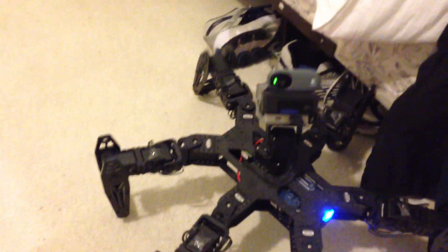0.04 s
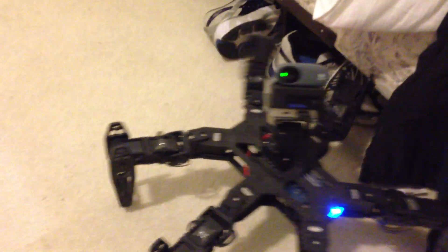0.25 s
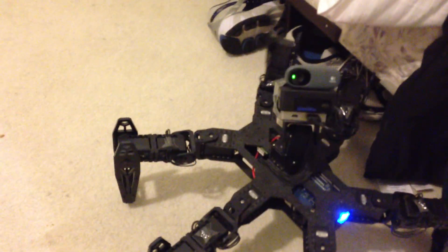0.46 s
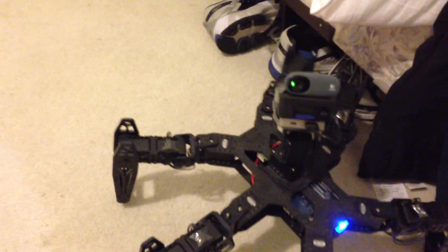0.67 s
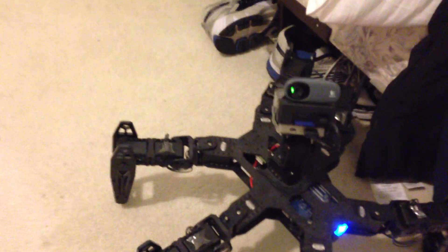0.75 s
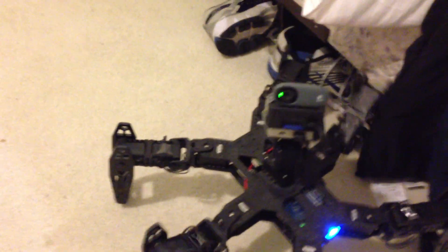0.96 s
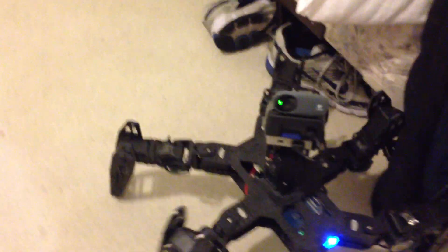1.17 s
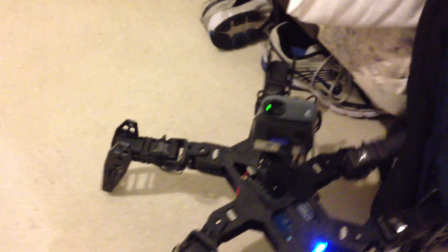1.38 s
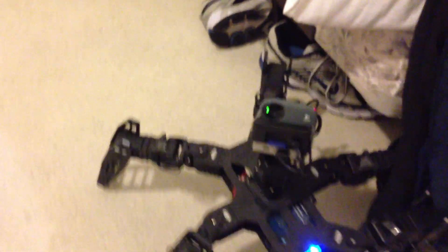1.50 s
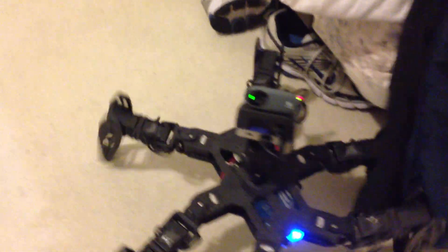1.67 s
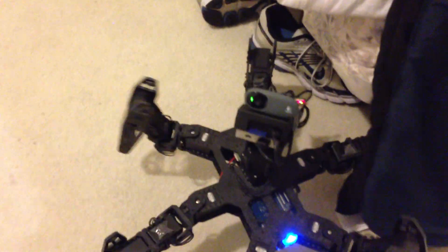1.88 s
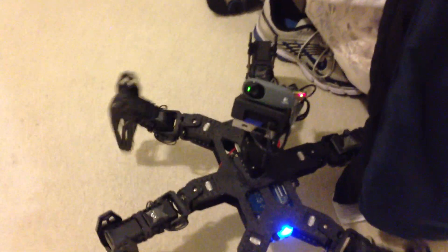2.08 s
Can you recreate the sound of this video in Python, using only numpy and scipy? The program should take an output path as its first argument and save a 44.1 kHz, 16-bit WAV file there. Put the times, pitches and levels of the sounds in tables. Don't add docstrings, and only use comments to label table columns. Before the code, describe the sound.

Close, thin phone-like pickup of a walking robot on carpet: raspy motor whines surge and drop in a steady stride rhythm, fluttering rapidly, with joint clicks and faint dull thumps over quiet room air.

```python
import sys
import numpy as np
from scipy import signal
from scipy.fft import rfft, irfft
from scipy.io import wavfile
from scipy.ndimage import uniform_filter1d

SR = 44100
rng = np.random.default_rng(int(sys.argv[2]) if len(sys.argv) > 2 else 0)


def inscribe(sig):
    pcm = np.round(np.clip(np.atleast_2d(sig).T, -1, 1) * 32767)
    wavfile.write(sys.argv[1], SR, pcm.astype(np.int16))


def field_ratio(decibels):
    return 10 ** (np.asarray(decibels, dtype=float) / 20)


N = 94506

# time in seconds, rattle level in dB.
EFFORT = [(0, -62), (.045, -79.5), (.16, -58), (.34, -57), (.46, -77.5), (.55, -60.5), (.72, -56),
          (.84, -78), (.98, -54), (1.15, -56.5), (1.24, -79), (1.31, -57), (1.52, -58), (1.6, -78),
          (1.75, -52.5), (1.92, -59.5), (2.01, -77), (2.14, -55.5)]
MULTIPLES_DB = [-7, 0, -3, -20, -20, -12]
# frequency in Hz, level in dB.
HOUSING = [(300, -30.5), (1110, -21.5), (2300, -13), (3200, -12), (4500, -6), (7000, -4.5), (9090, -16),
           (15400, -10)]
# frequency in Hz, width in Hz, boost in dB.
RINGS = [(2265, 190, 0.5), (5600, 1100, 2.5), (6700, 290, -4), (14800, 760, 3.5)]
# start in seconds, peak level in dB, pitch as a multiple of the usual one.
KNOCKS = [
    (.777, -36, 1.),
    (.984, -48, 1.1),
    (.998, -47, 1.2),
    (1.016, -45, 1.1),
    (1.203, -39, 1.6),
    (1.191, -49, 6.5),
    (1.972, -52, 10.),
]
# frequency in Hz, level in dB, time to fall by 60 dB in seconds.
KNOCK_MODES = [(890, -3, .014), (1250, -2, .009), (1770, 0, .011), (2200, -2, .008), (2900, -3, .007),
               (520, -13, .01)]
# centre in seconds, length in seconds, pitch in Hz, level in dB.
THUMPS = [
    (.56, 0.05, 208, -63),
    (0.733, 0.19, 241, -67),
    (1.1, 0.21, 223, -73.5),
    (1.369, 0.042, 228, -69),
    (1.79, 0.22, 323, -70.5),
]
# frequency in Hz, level in dB per Hz.
ROOM = [(25, -19), (64, -12.5), (110, -4.5), (209, 2), (1140, -8), (5400, -6.5), (13500, -17.5),
        (14500, -27)]
# time in seconds, tooth rate in Hz.
EARLY_SPEEDS = [
    [(.1, 1250), (.125, 1480), (.15, 1500), (.175, 1900), (.2, 2150), (.225, 2250), (.25, 2420), (.3, 1780),
     (.39, 1380)],
    [(.12, 1000), (.155, 1130), (.19, 1200), (.28, 2100), (.32, 2220), (.35, 1950), (.4, 1400), (.43, 1100)],
    [(.53, 1500), (.585, 2000), (.62, 2170), (.67, 2250), (.703, 2140), (.73, 1780), (.755, 1360),
     (.79, 1000)],
    [(.88, 1300), (.915, 1460), (.94, 1380), (.985, 2050), (1.01, 2460), (1.035, 2310), (1.06, 2460),
     (1.135, 1830), (1.19, 1200)],
]
# time in seconds, tooth rate in Hz.
LATE_SPEEDS = [
    [(1.27, 1500), (1.32, 2000), (1.34, 2240), (1.39, 2300), (1.44, 2410), (1.48, 1650), (1.515, 1400),
     (1.57, 1400)],
    [(1.36, 1600), (1.415, 1830), (1.46, 2060), (1.495, 2430), (1.52, 2330), (1.57, 1600)],
    [(1.65, 1700), (1.695, 2500), (1.72, 2510), (1.745, 2300), (1.77, 2400), (1.795, 2370), (1.82, 2170),
     (1.845, 1970), (1.95, 1200)],
    [(1.68, 1200), (1.72, 1400), (1.77, 1200), (1.81, 2200), (1.845, 2310), (1.87, 2330), (1.905, 2250),
     (1.93, 1900), (1.98, 1400)],
    [(2.03, 1200), (2.08, 1400), (2.11, 1750), (2.14, 2300)],
]
LOADS_DB = [
    [-58, -51, -54, -51.5, -59, -51, -53, -63, -62],
    [-74, -46, -69, -66, -71, -67, -61, -85],
    [-77, -57, -53.5, -57, -48, -59, -50.5, -63],
    [-63, -51.5, -49.5, -54, -48.5, -51, -46.5, -51, -68],
    [-79, -65, -60.5, -55.5, -61, -60, -52, -63],
    [-85, -62, -63, -55.5, -66, -70],
    [-64.5, -56, -55.5, -53, -45.5, -47, -49, -52, -83.5],
    [-55.5, -52, -51.5, -68, -58, -50.5, -57, -55, -85],
    [-71, -66, -57.5, -59.5],
]
# frequency in Hz, level in dB.
WHINE_COLOUR = [(900, -25), (2200, -1), (5000, 3.5), (7000, 9.5), (8500, 2), (12000, 3), (15000, 4)]
# centre in seconds, length in seconds, pitch in Hz, level in dB.
BUZZES = [
    (0.54, 0.057, 5270, -56),
    (.155, 0.023, 2280, -49),
    (0.618, 0.086, 5200, -49),
    (0.73, .15, 5500, -57.5),
    (0.33, 0.16, 6000, -58.5),
    (0.59, 0.021, 2270, -54),
    (1.76, 0.11, 4240, -51.5),
]

CLOCK_HZ, CLOCK_S = 39.5, -.002
SPEED_SAG, SURGE_DB, RATTLE_SURGE_DB = .1, 13, 1.


def level(x, db):
    return x * field_ratio(db) / np.sqrt(np.mean(x ** 2))


def colour(x, points, rings=()):
    hz = np.arange(len(x) // 2 + 1) * SR / len(x) + 1
    point_hz, point_db = np.array(points).T
    db = np.interp(np.log(hz), np.log(point_hz), point_db)
    for ring_hz, width_hz, boost_db in rings:
        db = db + boost_db / (1 + (2 * (hz - ring_hz) / width_hz) ** 2)
    return irfft(rfft(x) * field_ratio(db), len(x))


def walk(rate, size=N):
    hold = int(SR / rate)
    steps = np.repeat(rng.standard_normal(size // hold + 1), hold)
    return 1.3 * uniform_filter1d(uniform_filter1d(steps, hold), hold)[:size]


def lull(t, shift=0):
    return np.sin(np.pi * ((t - CLOCK_S) * CLOCK_HZ + shift)) ** 2


def swells(t, rows, width):
    out = 0
    for centre, length, hz, db in rows:
        peak = [(hz / (1 + 4 * width), -50), (hz / (1 + width), -20), (hz, 0),
                (hz * (1 + width), -20), (hz * (1 + 4 * width), -50)]
        ring = level(colour(rng.standard_normal(N), peak), db)
        out = out + ring * np.exp(-((t - centre) / length * 2) ** 2)
    return out


def room(t):
    air = level(colour(rng.standard_normal(N), ROOM), -65) * field_ratio(0.3 * walk(4.03))
    hum = field_ratio(-80 + 1.4 * walk(9)) * np.sin(2 * np.pi * 118.3 * t)
    return air + hum


def thumps(t):
    return swells(t, THUMPS, width=0.83)


def room_echo(robot, t):
    u = t[:SR // 3]
    fade = field_ratio(-60 * u / 0.082)
    tail = rng.standard_normal(len(u)) * fade * (u > .004)
    echo = signal.fftconvolve(robot, tail / np.sqrt(np.sum(tail ** 2)))[:N]
    return field_ratio(-8) * echo


def panel_buzz(t):
    return swells(t, BUZZES, width=0.17)


def knocks(t):
    out = 0
    for start, db, pitch in KNOCKS:
        u = np.clip(t - start, 0, .1)
        ring = 0
        for hz, mode_db, t60 in KNOCK_MODES:
            fade_db = -60 * u / t60 * pitch ** .6
            small_db = -6 * max(pitch - 2, 0) * np.log2(max(hz / 900, 1))
            tone = np.sin(2 * np.pi * hz * pitch * u) * (hz * pitch < 15000)
            ring = ring + field_ratio(mode_db + fade_db + small_db) * tone
        rise = 1 - np.exp(-u / .0004)
        out = out + field_ratio(db) * rise * ring
    return colour(out, [(150, -30), (600, 0)])


def rattle(t, effort_db):
    hit = rng.random(N) < 16000 / SR
    click_db = 1.2 * walk(150) - RATTLE_SURGE_DB * lull(t)
    clicks = hit * rng.standard_normal(N) * field_ratio(click_db)
    return level(colour(clicks, HOUSING, RINGS), 7) * field_ratio(effort_db)


def whine(hz, db, slack):
    size = len(hz)
    speed = hz * (1 - SPEED_SAG * slack + .017 * walk(400, size=size))
    turn = 2 * np.pi * np.cumsum(speed) / SR
    upper_db = 8 * np.log2(hz / 2200)
    stack = 0
    for k, multiple_db in enumerate(MULTIPLES_DB, 1):
        tone_db = multiple_db + 2.5 * walk(120, size=size) + (k >= 3) * upper_db
        stack = stack + field_ratio(tone_db) * np.sin(k * turn) * (k * hz < 20000)
    return stack * field_ratio(db - SURGE_DB * slack)


def far_servos(t, effort_db):
    pace = field_ratio((effort_db - effort_db.max()) * .3)
    out = 0
    for _ in range(5):
        hz = 2200 * pace * np.exp(.18 * walk(9))
        out = out + whine(hz, 2.5 * walk(25), lull(t, rng.random()))
    return level(colour(out, HOUSING, RINGS), -3) * field_ratio(effort_db)


def near_servos(t):
    out = np.zeros(N)
    for sweep, load_db in zip(EARLY_SPEEDS + LATE_SPEEDS, LOADS_DB):
        times, hz = np.array(sweep).T
        on = (t >= times[0]) & (t <= times[-1])
        speed = np.interp(t[on], times, hz)
        out[on] += whine(speed, np.interp(t[on], times, load_db), lull(t[on]))
    return colour(out, WHINE_COLOUR)


def scene():
    t = np.arange(N) / SR
    effort_db = np.interp(t, *np.array(EFFORT).T)
    gears = near_servos(t) + far_servos(t, effort_db) + rattle(t, effort_db)
    robot = gears + knocks(t) + panel_buzz(t)
    return (robot + room_echo(robot, t) + thumps(t) + room(t))[None]


def top_cut(x):
    return signal.sosfilt(signal.butter(12, 15600, fs=SR, output="sos"), x)


def record(dry):
    kept = colour(dry[0], [(20, -12), (70, 0), (15350, 0), (15500, -60)])
    return top_cut(kept[None])


dry = scene()
out = record(dry)
inscribe(out)
```